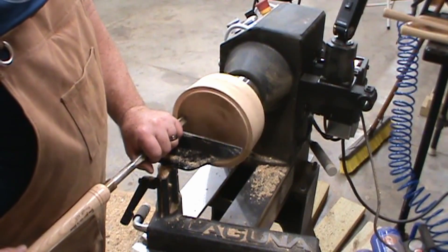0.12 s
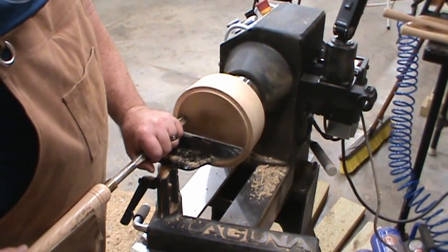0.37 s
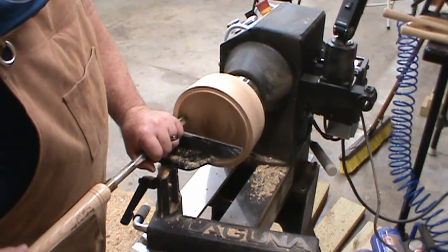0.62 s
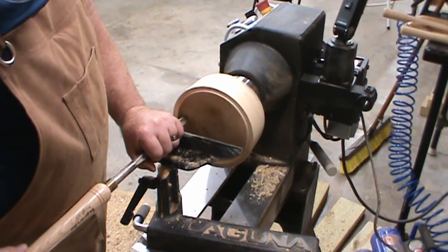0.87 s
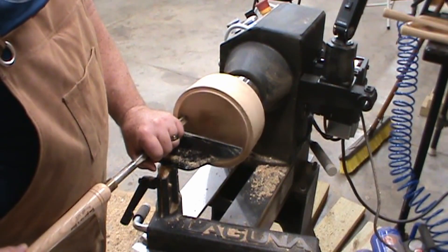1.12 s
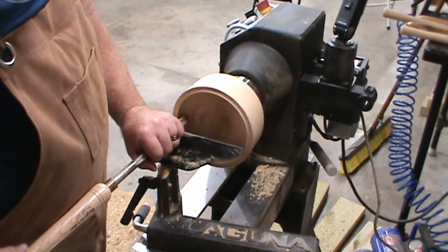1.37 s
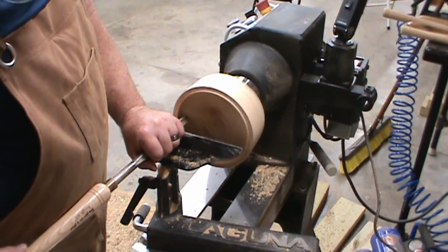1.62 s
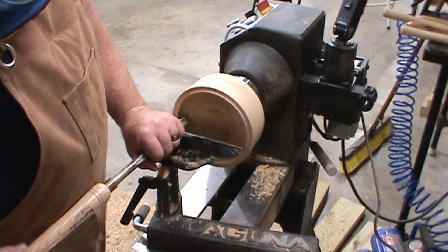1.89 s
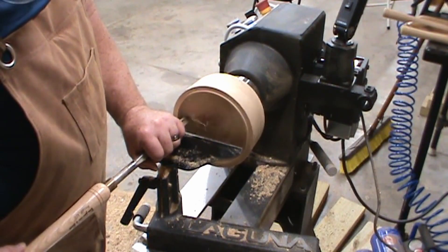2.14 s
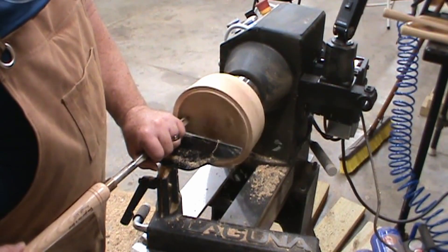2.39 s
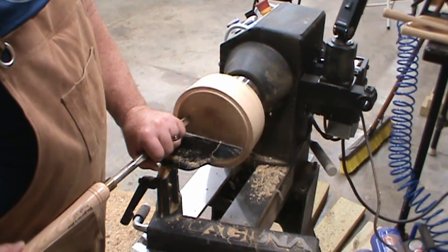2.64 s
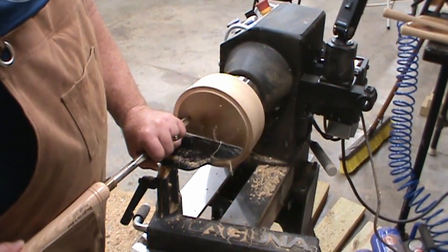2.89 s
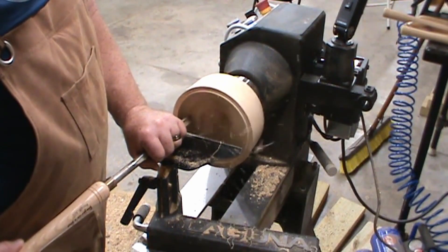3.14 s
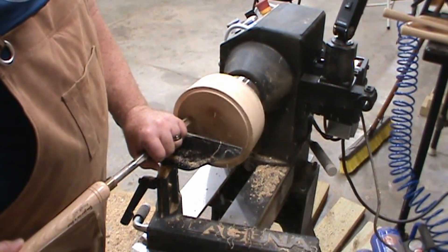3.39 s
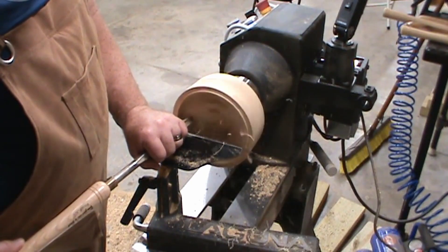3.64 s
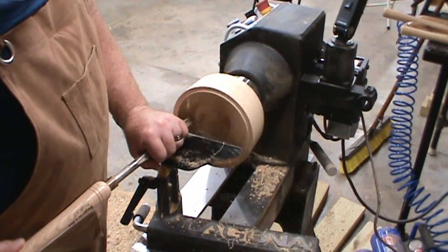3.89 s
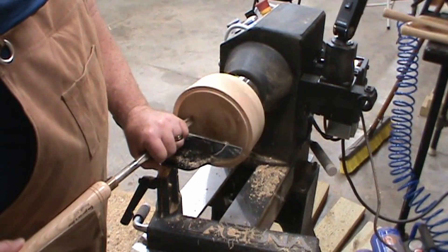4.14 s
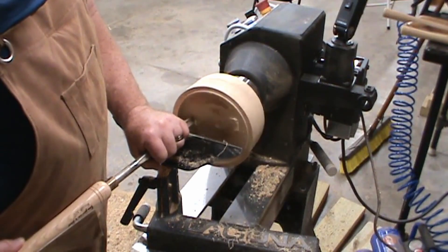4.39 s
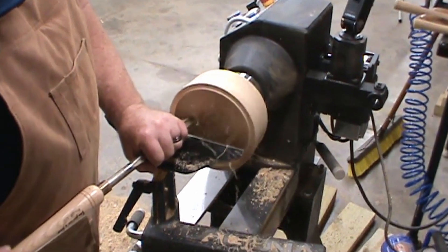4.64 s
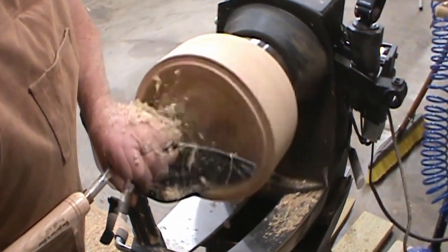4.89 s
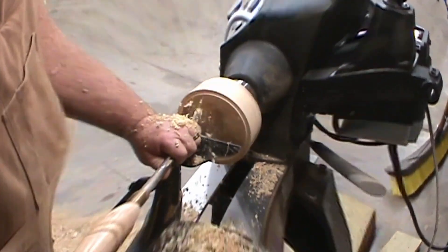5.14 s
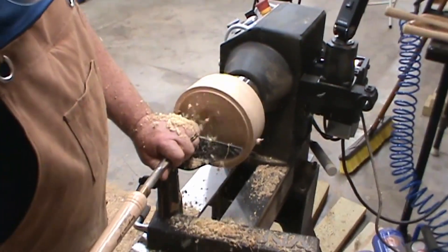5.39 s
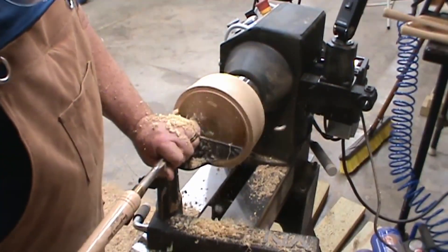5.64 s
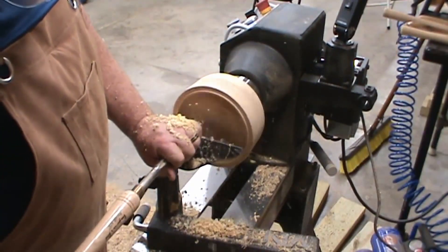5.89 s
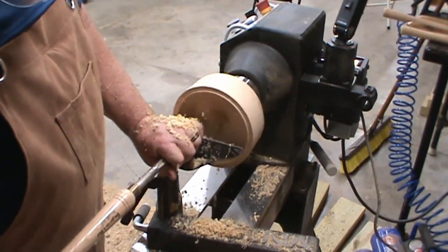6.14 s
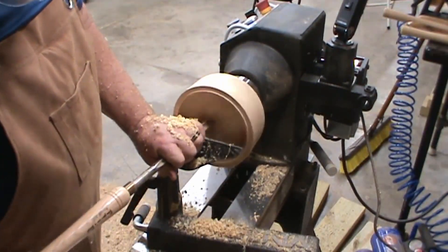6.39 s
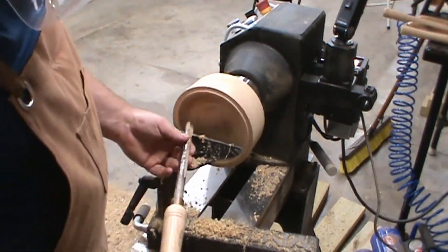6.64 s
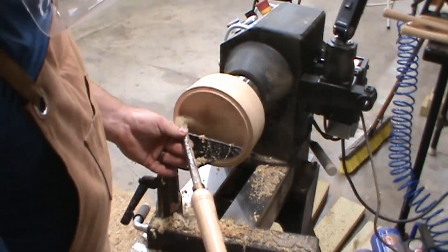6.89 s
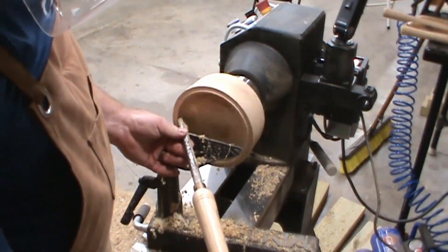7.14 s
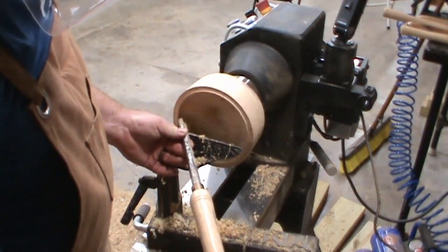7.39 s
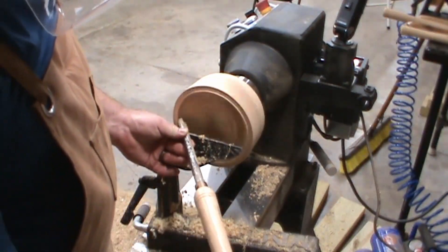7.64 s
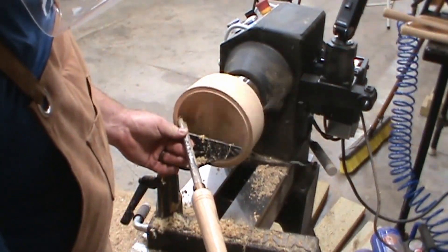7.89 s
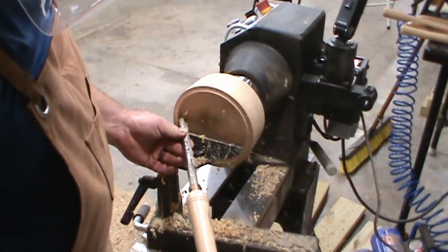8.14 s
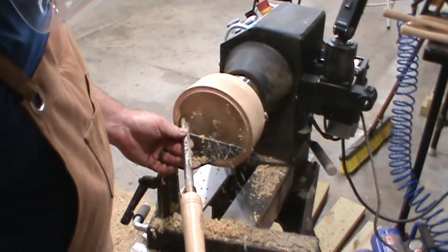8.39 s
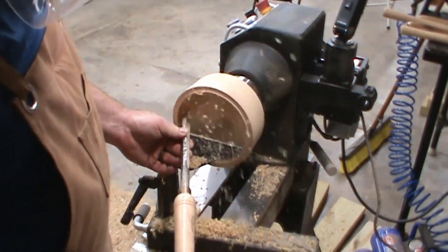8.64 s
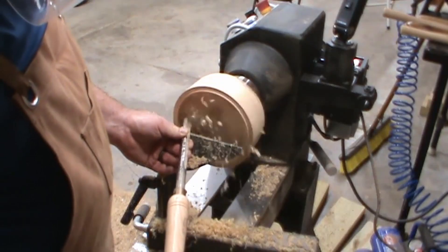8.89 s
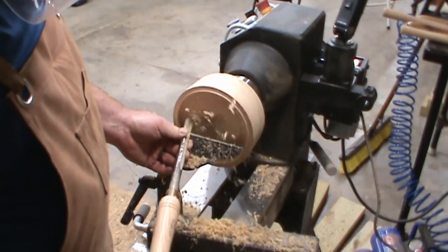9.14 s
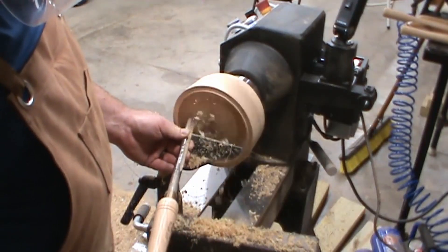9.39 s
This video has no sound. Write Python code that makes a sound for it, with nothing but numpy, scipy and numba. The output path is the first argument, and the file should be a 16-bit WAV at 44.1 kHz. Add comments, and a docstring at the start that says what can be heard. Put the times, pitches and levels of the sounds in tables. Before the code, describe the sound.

A lathe motor runs throughout with a thin, steady high whine, low-level hum bands and shop air. From about 1.0 s three faint ticks come fast, then from 1.2 s gritty bites repeat nearly fourteen times a second, each opening with a tiny falling chirp. By 2.1 s they merge into a loud, bright, dense crackling scrape with flickering treble, holding until 4.9 s. A sharp bright burst at 4.96 s starts a fuller, woody, hollow-ringing cut that lasts to 6.4 s. The motor is exposed again; a soft knock and tick follow at 6.7-6.9 s, then a brief scrape, a hard click and short nasal chatter near 7.05 s. Uneven catches and light scrapes run from 7.14 to 7.8 s with tiny gaps. From about 7.9 s a strong sustained cut tears and hisses, growing more resonant until the end around 9.5 s. Close and dry, with a short room.

```python
"""A hand-held gouge cuts a wooden bowl blank spinning on a lathe in a workshop.
Fibres tear in a dense crackle of clicks and friction noise that rings the modes of blank, tool and rest.
At first the high side of the out-of-round rim bites once a turn; then come long cuts, catches and a chatter.
Underneath, the inverter-fed motor whines in steady tones, with noisy hum bands and the air of the shop.
The cut also sounds through a short room made of feedback delays, and its treble flickers."""
import sys
import numpy as np
from scipy import signal
from scipy.fft import rfft, irfft, next_fast_len
from scipy.io import wavfile
from numba import njit

SR = 44100
rng = np.random.default_rng(int(sys.argv[2]) if len(sys.argv) > 2 else 0)


def generate_wav(signal):
    """Clip the signal to [-1, 1] and save it as 16-bit WAV at the path in sys.argv[1]."""
    frames = np.transpose(np.atleast_2d(signal))
    scaled = np.clip(frames, -1, 1) * 32767
    pcm = np.round(scaled).astype(np.int16)
    wavfile.write(sys.argv[1], SR, pcm)


def volts(x):
    """Linear amplitude factor 10**(x/20) for a level x in dB, scalar or array-like."""
    e = np.asarray(x, float) / 20
    return 10 ** e


N = 419832
STEP = 40   # samples per control step
TIME = np.arange(N) / SR
SIZE = next_fast_len(N + SR)
HZ = np.maximum(np.fft.rfftfreq(SIZE, 1 / SR), 1)
TOP_HZ = 15720   # top of the band

# motor and belt hum, before the running level: pitch_hz, width_hz, level_db (rms)
HUM_BANDS = [(48, 12, -62.5), (95.5, 7.7, -63), (486, 170, -59.5), (575, 40, -66), (845, 29, -61.5),
             (1070, 520, -54), (3080, 180, -60), (4100, 250, -66), (8000, 260, -63), (8600, 300, -61),
             (12200, 540, -54)]
# colour of the shop air, relative: pitch_hz, level_db
SHOP_AIR = [(12, -37), (20, -11), (110, 0), (175, -7), (292, -5.5), (400, -2), (510, -7), (700, -5.5),
            (1000, -4), (3600, -12), (4020, -10), (6840, -16), (7860, -2.5), (9040, -17.5), (12300, -14),
            (15800, -21)]
SHOP_AIR_DB = -49.5   # rms, before the running level
# stereo spread of the motor and air: pitch_hz, side_against_mid_db
MOTOR_SIDE = [(60, -31), (180, -12), (550, -14.5), (1650, -4.5), (4970, -10), (15000, -13)]
# level of motor and air through the scene: time_s, level_db
RUNNING_LEVEL = [(1.5, -1.5), (4.9, -9.5), (6.4, -7), (6.5, -1), (7.9, -2.5), (8.5, -5)]
FADING_HUM_HZ, FADING_HUM_WIDTH_HZ, FADING_HUM_DB, FADING_HUM_T60_S = 328, 40, -49, 2
CARRIER_HZ, SHAFT_HZ = 4000.1, 16.285   # inverter switching rate, motor shaft rate
# whine around 0, 1, 2 and 3 times the carrier, one row each: offsets in whole shaft orders
TONE_ORDERS = [
    [9, 27, 28, 30, 31, 32, 35, 36, 37],
    [-7, -6, -5, -3, -2, 2, 3, 4, 5, 6, 7, 9, 10, 30, 31],
    [-32, -12, -9, -4, -1, 0, 4, 9],
    [-6, -2, 2, 6, 12, 30],
]
# the same tones, before slow drift and running level: level_db (rms)
TONE_LEVELS = [
    [-68, -63, -60, -66, -57, -61, -63, -65, -68],
    [-62, -63, -70, -66, -62, -66, -67, -70, -65, -61, -66, -67, -68, -72, -71],
    [-63, -67, -65, -59, -64, -45, -56, -64],
    [-60, -59, -63, -58, -69, -65],
]
# once cutting has begun the shaft speed wavers: time_s, waver (rms share of the shaft rate)
SHAFT_WAVER = [(1.2, 0), (2, .012)]

TURNS_PER_S = 13.6   # of the blank
FIRST_TICK_S = 0.966
# the rim brushes the edge once a turn, before each tick's envelope: level_db (rms)
TICK_LEVELS = [-41, -39, -38]
# tone of every tick: pitch_hz, width_hz, fall_s
TICK_TONE = (5500, 2500, 0.0027)
# short coloured bursts: ticks, a soft knock, and bright onsets of catches;
# level before the envelope: start_s, level_db (rms), pitch_hz, width_hz, fall_s
BURSTS = [(1.177, -31, 3500, 3480, .002), (6.715, -38, 1780, 2000, 0.009), (6.888, -40, 5500, 2500, 0.0036),
          (7.059, -18, 3640, 150, .007), (7.06, -29, 5500, 1500, .006), (7.142, -20, 4600, 1600, 0.01)]

# stretches of cutting sound, with a short bright burst at 4.962 s: time_s, cut_db
STRETCHES = [
    [(1.2, -38), (1.66, -36.5), (1.75, -26.5), (2.06, -21.5), (2.14, -18), (3, -17), (3.9, -17.5),
     (4.78, -17), (4.865, -22), (4.88, -22), (4.955, -26)],
    [(4.962, -11), (4.974, -16)],
    [(4.979, -20.5), (5.1, -20.5), (5.84, -19), (6.42, -22.5), (6.432, -36), (6.447, -30.5)],
    [(6.921, -28), (6.935, -31), (6.95, -23.5), (6.968, -29.5)],
    [(7.025, -39), (7.045, -33), (7.13, -33), (7.19, -29.5), (7.215, -25.5), (7.5, -23.5), (7.525, -30),
     (7.558, -37)],
    [(7.63, -25.5), (7.66, -28), (7.788, -22.5)],
    [(7.818, -27), (7.86, -28.5), (7.96, -20), (8.55, -19.5), (9.52, -21.5)],
]
FADE_IN_S, FADE_OUT_DB_PER_S = 0.0028, 752   # of every stretch
FIRST_BITE_S, RIM_BITE_S, RIM_BITE_GROWS_S = 1.2305, 0.035, 0.00085   # start, length, growth a turn
# the high side of the rim meets the edge once a turn, before the sag: level_db
RIM_BITES = [-20.5, -22, -24.5, -21, -22.5, -24, -20.5, -17.5, -19, -19.5, -21.5, -18]
# the edge catches in the wood, level before the sag: start_s, level_db, length_s
CATCHES = [(1.171, -34, 0.013), (7.142, -22.5, 0.014), (7.21, -22.5, 0.018), (7.287, -22, 0.051),
           (7.393, -20, 0.011), (7.452, -18.5, 0.03), (7.53, -23.5, 0.02)]
BITE_RISE_S, BITE_SAG_DB_PER_S, BITE_FALL_S = 0.00091, 67, 0.012
# hard and soft grain passing the edge: times_a_turn, swing_db, phase_turns
GRAIN = [(1, 0.51, 0.086), (2, 0.72, 0.12), (3, 0.55, 0.91)]

# stance of the tool, 0 thin and bright, 1 steady push, 2-3 deep cut moving inward,
# 4 light skim, 5-6 sweep: time_s, stance (0-6)
STANCE = [(1.9, 0), (2.2, 1), (4, 1), (4.7, 1.25), (4.958, 1.25), (4.961, 0), (4.974, 0), (4.979, 2),
          (5.4, 2), (6.2, 3), (6.6, 3), (6.8, 4), (7.85, 4), (8.3, 5), (8.6, 5), (9.2, 6)]
# direct sound of tearing: pitch_hz, then gain_db in each stance 0 to 6
TEAR_COLOUR = [(103, -30, -29, -20, -17, -8, -18, -20), (171, -28, -24, -19, -9, -20, -27, -10),
               (298, -10, -11, -10.5, -5, -7, -9.5, -5.5), (700, -17, -8.5, -5, -1.5, -5, -9, -8),
               (1060, -12, -10.5, -1.5, -4.5, 0, -13, -3.5), (1574, -7, 0.5, 2.5, 1.5, -0.5, 0.5, 6.5),
               (2500, 4.5, 7, -1, 1.5, -0.5, -1.5, 3.5), (4430, 2, 2, -0.5, 1, 5.5, 4, 3),
               (6180, 0, 0.5, -5, 2.5, 3, 2.5, 2.5), (7030, -9.5, -9.5, -13, -5, -0.5, -5, -11.5),
               (11600, -7.5, -10.5, -5.5, -1.5, -1.5, -4, -4.5), (14300, -19, -27, -13, -14, -10, -14, -12),
               (15800, -24, -36, -19, -19, -17, -19, -19)]
# modes of blank, tool and rest, before they vary: pitch_hz, width_hz, then gain_db in each stance 0 to 6
BODY_MODES = [(240.3, 16.8, -4, 2.5, 12.5, 13.5, 13, 0, 6.5), (354, 41, -21, -15, -3, -6, 4.5, -8, -6),
              (569.7, 19.7, -1, 1, 4.5, 7, 0, -0.5, 2), (783, 7.3, -1, 5, 1, -7, -12, -8, -5),
              (818, 62, -17, -10, 4.5, 10, -14, -9, 8), (1146, 77, 1, 3.5, 3.5, 3, 9, 7, 5.5),
              (1396, 25, 4.5, 4.5, 8, 6, -3, 0, -8), (1571, 26, -1, -16, 12, -10, -21, -4, 14),
              (1732, 21, -7, -11, 11, -9, -12, 7.5, 9), (1855, 16, 5.5, 7.5, 9, 11.5, 4, 10, 8),
              (1979, 25, 5, 7.5, 15.5, 8, 3, 6, 10), (2126, 21, 11.5, 8.5, 8, 7, 8, -1, 15),
              (2230, 100, -16.5, -21, 14, -11, 4, 8.5, 9), (2415, 42, -13, -5, 14.5, 8, 5, 4, 6),
              (2715, 85, 3.5, -9, -18, 16, -18, -15, -13), (2922, 78, 10.5, 12.5, 14, 10, 5.5, 14.5, 15),
              (3216, 28, 2.5, 9.5, -7, 10, 3, 10, 7.5), (3566, 26, 5, -5, -12, -10, 6, 10, 8),
              (3782, 36, 8, 4, 13, -12, 7, 4, 6), (4050, 94, 4.5, 6, 1, 11, -1, 8.5, 2),
              (4610, 120, -15, -30, -13, -14, 6, -8, -8), (5220, 123, 6, 7.5, 6, 8.5, 1, 4.5, 9.5),
              (5380, 17, 5, 10.5, 9, 16.5, 10, -6, 16), (5705, 54, 3, -1, -2, -6, 0, 9, 4),
              (6550, 78, -9, -3, 8.5, 0, -3, 1, 10), (7880, 220, -25, -14.5, -0.5, -5, -11, -7, -4),
              (9320, 120, -12, -37, -1, 1, 3, 0.5, 1), (10650, 300, -17, -13.5, -7, -11, -3, -8, -11)]
# extra gain of the low modes: time_s, gain_db
THRUM = [(2.6, -3), (3.9, -2), (4.5, 2.5), (5, -5.5), (5.9, -0.2), (6.9, -2.5)]
THRUM_EDGE_HZ, MODE_WANDER = 900, 0.0078   # top of the low modes; rms share of an upper mode's pitch
MODE_TURN_DB = 1.5   # each mode swells once a turn, at its own place on the blank
BODY_LOW_CUT_HZ = 175   # low cut of the ringing modes, which sound thin below this
# each rim bite opens with a chirp as the edge digs in
CHIRP_FROM_HZ, CHIRP_TO_HZ, CHIRP_GLIDE_S = 3150, 2450, .01
CHIRP_WIDTH_HZ, CHIRP_FALL_S, CHIRP_DB = 220, 0.01, 14.5
# the edge chatters as it settles
CHATTER_FROM_S, CHATTER_TO_S, CHATTER_HZ, CHATTER_WIDTH_HZ = 7.034, 7.125, 1185, 36
# lines on 1, 2, 3.. times the chatter pitch, before the envelope: level_db (rms)
CHATTER_LINES = [-46, -39, -40, -41, -47]

HISS_EDGE_HZ = 6700   # where scrape gives way to hiss
# watery treble, stronger before 4.9 s: time_s, swing_db (rms)
WATERY_TREBLE = [(4.9, 4), (5, 1.5)]
# lean of the cut: pitch_hz, left_minus_right_db
CUT_LEAN = [(60, -3), (99, 1), (160, -1), (270, -0.5), (450, -0.5), (740, -0.5), (1220, -0.5), (2010, 1),
            (3330, 2), (5500, 0.5), (9080, 0.5), (15000, -0.5)]
# stereo spread of the cut, before the widths below: pitch_hz, side_against_mid_db
CUT_SIDE = [(30, -30), (60, -31), (130, -31), (290, -29), (640, -11), (1410, -9), (3100, -13.5),
            (6800, -13.5), (15000, -11.5)]
# place of the cut: time_s, left_minus_right_db, scrape_width_db, hiss_width_db
CUT_PLACE = [(1.1, 0.2, -6.5, 8.5), (4.9, 0.5, -3, 6), (5, -0.5, 1.5, 4), (7, -0.3, 0, 0),
             (7.9, -0.9, 0, 2.5), (9.52, -0.5, 1, 3)]
ROOM_T60_S, ROOM_DB, WALL_CUT_HZ = 0.15, -9, 2600   # T60 before the walls dull the echoes


def rms_one(x):
    """Scale to unit rms."""
    return x / np.sqrt(np.mean(x ** 2) + 1e-20)


def curve(rows):
    """Columns of a time table at every sample."""
    s, *columns = np.transpose(rows)
    return np.array([np.interp(TIME, s, c) for c in columns])


def gain_over_hz(points):
    """Gain of a dB spectrum on the FFT grid."""
    hz, db = np.transpose(points)
    return volts(np.interp(np.log(HZ), np.log(np.maximum(hz, 1)), db))


def slow_chance(rate_hz):
    """Smoothed chance of rms 1 that varies at the given rate, one value a control step."""
    r = np.exp(-2 * STEP * np.pi * rate_hz / SR)
    noise = rng.standard_normal(N // STEP + 2002)
    return rms_one(signal.lfilter([1], [1, -2 * r, r * r], noise)[2000:])


def drift(rate_hz):
    """Slow chance at every sample."""
    slow = slow_chance(rate_hz)
    return np.interp(np.arange(N) / STEP, np.arange(len(slow)), slow)


def split(x, edge_hz):
    """Parts of x below and above an edge."""
    low = irfft(rfft(x, SIZE) / (1 + (HZ / edge_hz) ** 8), SIZE)[..., :N]
    return low, x - low


def resonate(x, hz, width_hz):
    """Two-pole resonance with gain 1 on top."""
    r = np.exp(-np.pi * width_hz / SR)
    push = np.array([1, 0, -1]) * (1 - r * r) / 2
    return signal.lfilter(push, [1, -2 * r * np.cos(2 * np.pi * hz / SR), r * r], x)


@njit
def resonate_moving(x, r, gain, twice_cos, step):
    """Two-pole resonance whose drive and centre move step by step."""
    y = np.zeros_like(x)
    for c in range(x.shape[0]):
        for i in range(2, x.shape[1]):
            k = i // step
            push = gain[k] * (1 - r * r) / 2 * (x[c, i] - x[c, i - 2])
            y[c, i] = push + r * twice_cos[k] * y[c, i - 1] - r * r * y[c, i - 2]
    return y


def to_stereo(mid, other, side_db):
    """An unrelated second strand, weighted by frequency, is the left-right difference."""
    side = irfft(rfft(other, SIZE) * gain_over_hz(side_db), SIZE)[:N]
    return np.array([mid + side, mid - side])


def shop_air_and_hum():
    """Coloured noise for the air; noise through resonances for the hum bands, one of them fading."""
    white = rng.standard_normal((2, N))
    coloured = irfft(rfft(white, SIZE) * gain_over_hz(SHOP_AIR), SIZE)[:, :N]
    out = volts(SHOP_AIR_DB) * rms_one(coloured)
    white = rng.standard_normal((2, N))
    for hz, width_hz, db in HUM_BANDS:
        out += volts(db) * rms_one(resonate(resonate(white, hz, width_hz), hz, width_hz))
    fading = rms_one(resonate(white, FADING_HUM_HZ, FADING_HUM_WIDTH_HZ))
    return out + volts(FADING_HUM_DB - 60 * TIME / FADING_HUM_T60_S) * fading


def inverter_whine():
    """Sine tones lie whole shaft orders off multiples of the inverter's carrier."""
    tones = [(k, n, db) for k, orders in enumerate(TONE_ORDERS) for n, db in zip(orders, TONE_LEVELS[k])]
    # the side strand is a quarter turn off, so tones stay centred
    phases = rng.random((len(tones), 1, 1)) + [[0], [1 / 4]]
    shaft_turns = np.cumsum(SHAFT_HZ * (1 + curve(SHAFT_WAVER)[0] * drift(3.03))) / SR
    out = np.zeros((2, N))
    for (k, n, db), phase in zip(tones, phases):
        turns = k * CARRIER_HZ * TIME + n * shaft_turns + phase
        out += np.sqrt(2) * volts(db + 0.92 * drift(4.5)) * np.sin(2 * np.pi * turns)
    return out


def motor():
    """Inverter tones, hum and shop air share one running level and one stereo spread."""
    mid, other = shop_air_and_hum() + inverter_whine()
    return volts(curve(RUNNING_LEVEL)[0]) * to_stereo(mid, other, MOTOR_SIDE)


def crackle(per_s, spread_db, smooth):
    """Two strands of tearing fibres: uneven clicks over smooth friction noise."""
    sizes = volts(spread_db * np.minimum(rng.exponential(1, (2, N)), 5))
    signs = rng.choice([-1, 1], (2, N))
    torn = rng.random(N) < per_s / SR
    return rms_one(rms_one(sizes * signs * torn) + smooth * rng.standard_normal((2, N)))


def ticks_and_bursts(drive):
    """Rim ticks and coloured bursts are the crackle through a resonance, quickly fading."""
    ticks = [(FIRST_TICK_S + k / TURNS_PER_S, db, *TICK_TONE) for k, db in enumerate(TICK_LEVELS)]
    out = np.zeros_like(drive)
    for s, db, hz, width_hz, fall_s in ticks + BURSTS:
        since = np.maximum(TIME - s, 0)
        shape = (1 - np.exp(-4 * since / fall_s)) * np.exp(-since / fall_s)
        out += volts(db) * shape * rms_one(resonate(resonate(drive, hz, width_hz), hz, width_hz))
    return out


def pressure():
    """Gain of the cut: powers of stretches and bites add, then grain and an unsteady hand vary it."""
    power = np.zeros(N)
    for stretch in STRETCHES:
        fade_in = 1 - np.exp(-np.maximum(TIME - stretch[0][0], 0) / FADE_IN_S)
        fade_out_db = -FADE_OUT_DB_PER_S * np.maximum(TIME - stretch[-1][0], 0)
        power += (fade_in * volts(curve(stretch)[0] + fade_out_db)) ** 2
    rim = [(FIRST_BITE_S + k / TURNS_PER_S, db, RIM_BITE_S + k * RIM_BITE_GROWS_S)
           for k, db in enumerate(RIM_BITES)]
    for s, db, length_s in rim + CATCHES:
        since = np.maximum(TIME - s, 0)
        rise = 1 - np.exp(-since / BITE_RISE_S)
        fall = np.exp(-np.maximum(since - length_s, 0) / BITE_FALL_S)
        power += (volts(db - BITE_SAG_DB_PER_S * since) * rise * fall) ** 2
    grain_db = sum(db * np.cos(2 * np.pi * (k * TURNS_PER_S * TIME - turn)) for k, db, turn in GRAIN)
    hand_db = 0.63 * drift(5.6) + 0.96 * drift(89)
    return np.sqrt(power) * volts(grain_db + hand_db)


def tearing(force, stance):
    """The crackle heard directly, its spectrum crossfading from stance to stance."""
    hz, *colours = np.transpose(TEAR_COLOUR)
    spectrum = 0
    for k, colour_db in enumerate(colours):
        share = np.maximum(1 - abs(stance - k), 0)
        spectrum = spectrum + rfft(force * share, SIZE) * gain_over_hz(np.transpose([hz, colour_db]))
    return irfft(spectrum / (1 + (55 / HZ) ** 4), SIZE)[:, :N]   # lows fall away below 55 Hz


def body(force, stance):
    """The crackle rings each mode, which waxes and wanes, upper ones wandering, as the edge loads the wood."""
    rings = 0
    stance, thrum_db, time = stance[::STEP], curve(THRUM)[0][::STEP], TIME[::STEP]
    for hz, width_hz, *db in BODY_MODES:
        slow, fast, wander = [slow_chance(rate)[:len(stance)] for rate in (1.5, 15., 9.)]
        gain_db = np.interp(stance, np.arange(len(db)), db) + slow + fast
        gain_db += thrum_db * (hz < THRUM_EDGE_HZ)
        gain_db += MODE_TURN_DB * np.cos(2 * np.pi * (TURNS_PER_S * time + rng.random()))
        angle = 2 * np.pi * hz * (1 + MODE_WANDER * wander * (hz > THRUM_EDGE_HZ)) / SR
        r = np.exp(-np.pi * width_hz / SR)
        rings = rings + resonate_moving(force, r, volts(gain_db), 2 * np.cos(angle), STEP)
    return split(rings, BODY_LOW_CUT_HZ)[1]


def chirps(force):
    """A resonance that glides down in the first moments of every rim bite."""
    turns = (TIME[::STEP] - FIRST_BITE_S) * TURNS_PER_S
    since = turns % 1 / TURNS_PER_S
    hz = CHIRP_TO_HZ + (CHIRP_FROM_HZ - CHIRP_TO_HZ) * np.exp(-since / CHIRP_GLIDE_S)
    biting = (turns >= 0) * (turns < len(RIM_BITES))
    gain = volts(CHIRP_DB) * np.exp(-since / CHIRP_FALL_S) * biting
    r = np.exp(-np.pi * CHIRP_WIDTH_HZ / SR)
    return resonate_moving(force, r, gain, 2 * np.cos(2 * np.pi * hz / SR), STEP)


def chatter(drive):
    """Stick-slip of the edge: narrow lines of noise on multiples of one pitch."""
    shape = np.clip(np.minimum(TIME - CHATTER_FROM_S, CHATTER_TO_S - TIME) / 0.01, 0, 1)
    near = slice(int((CHATTER_FROM_S - .5) * SR), int(CHATTER_TO_S * SR))
    out = np.zeros_like(drive)
    for k, db in enumerate(CHATTER_LINES):
        line = resonate(drive[:, near], (k + 1) * CHATTER_HZ, CHATTER_WIDTH_HZ)
        out[:, near] += volts(db) * rms_one(line)
    return out * shape


def gouge():
    """Pressure turns the crackle into a force, heard directly and through the modes, as two strands."""
    drive = crackle(per_s=6000., spread_db=2.0, smooth=0.91)
    force, stance = drive * pressure(), curve(STANCE)[0]
    out = ticks_and_bursts(drive) + tearing(force, stance) + body(force, stance)
    return out + chirps(force) + chatter(drive)


def watery_treble(x):
    """The treble flickers: the level of each narrow band above the scrape drifts by chance."""
    out, hiss = split(x, HISS_EDGE_HZ)
    spectrum, swing_db = rfft(hiss, SIZE), curve(WATERY_TREBLE)[0]
    edges = np.append(0, np.geomspace(HISS_EDGE_HZ, TOP_HZ, num=14)[1:])
    for low, high in zip(edges, edges[1:]):
        band = irfft(spectrum * ((HZ > low) & (HZ <= high)), SIZE)[:, :N]
        out += band * volts(swing_db * drift(30.0))
    return out


def workshop(x):
    """Six feedback delays a side, duller on every round."""
    turn = 2j * np.pi * HZ / SR
    dull = 1 / (1 + 1j * HZ / WALL_CUT_HZ)
    echoes = np.zeros((2, len(HZ)), complex)
    for k, lag in enumerate((rng.uniform(.012, .04, 12) * SR).astype(int)):
        loop = volts(-60 * lag / SR / ROOM_T60_S) * dull * np.exp(-turn * lag)
        echoes[k % 2] += loop / (1 - loop) * (-1) ** (k // 2)
    return irfft(rfft(x, SIZE) * echoes, SIZE)[:, :N]


def scene():
    """The cut, leaning left or right by frequency, with its room, over the running lathe."""
    mid, other = watery_treble(gouge())
    pan_db, *width_db = curve(CUT_PLACE)
    other = np.sum(volts(np.array(width_db)) * split(other, HISS_EDGE_HZ), axis=0)
    left, right = to_stereo(mid, other, CUT_SIDE)
    lean = gain_over_hz(CUT_LEAN) ** .5   # half the lean on each side
    cut = irfft([rfft(left, SIZE) * lean, rfft(right, SIZE) / lean], SIZE)[:, :N]
    pan = volts(pan_db / 2 * np.array([[1], [-1]]))
    return pan * cut + volts(ROOM_DB) * workshop(mid) + motor()


def roll_off(x):
    """The treble ends steeply here."""
    return signal.sosfilt(signal.butter(12, 16060, fs=SR, output="sos"), x)


def record(dry):
    """Peaks are gently rounded, then the top is cut."""
    rounded = 0.81 * np.tanh(dry / 0.79)
    mix = irfft(rfft(rounded, SIZE) * (HZ < TOP_HZ), SIZE)[:, :N]
    return roll_off(mix)


dry = scene()
out = record(dry)
generate_wav(out)
```